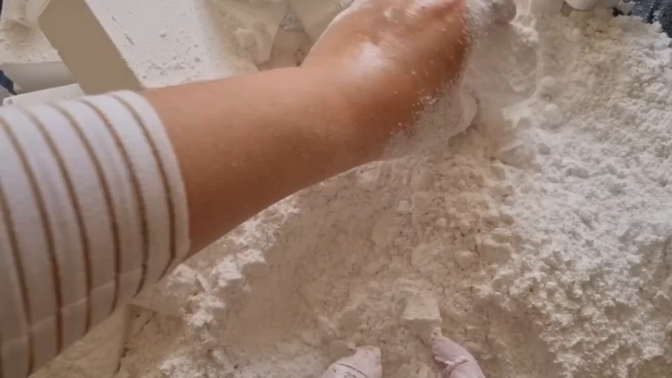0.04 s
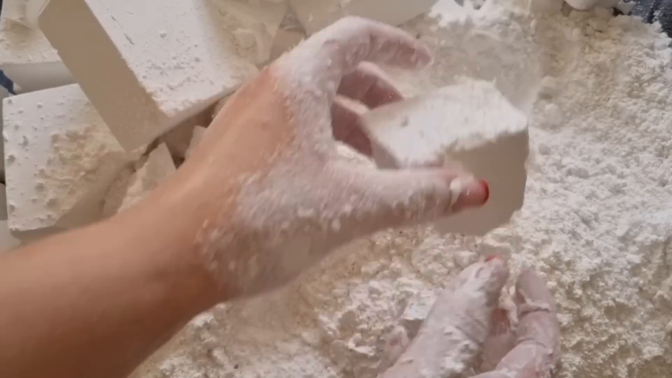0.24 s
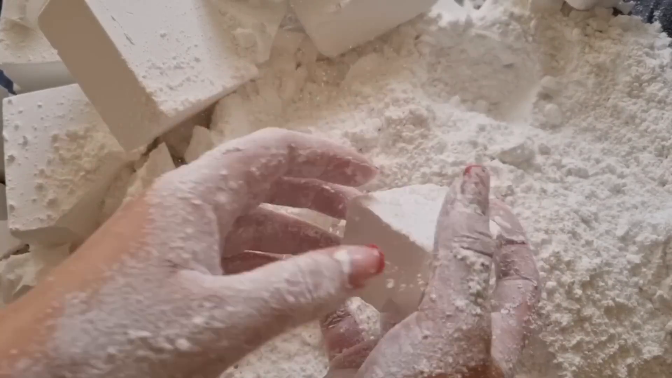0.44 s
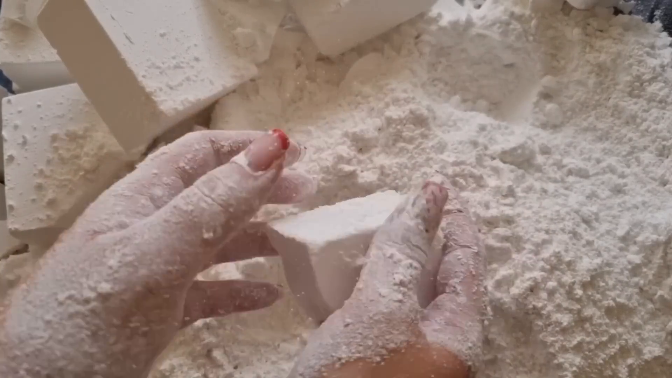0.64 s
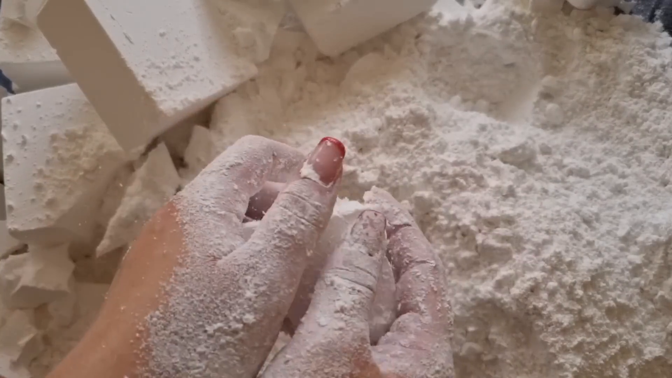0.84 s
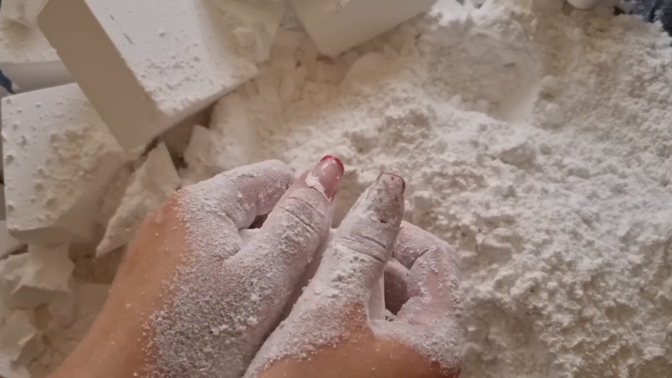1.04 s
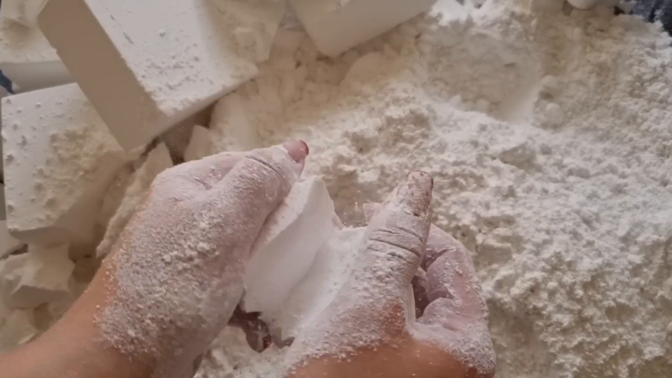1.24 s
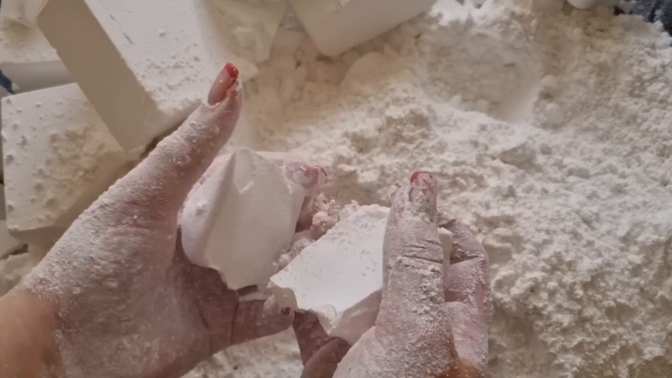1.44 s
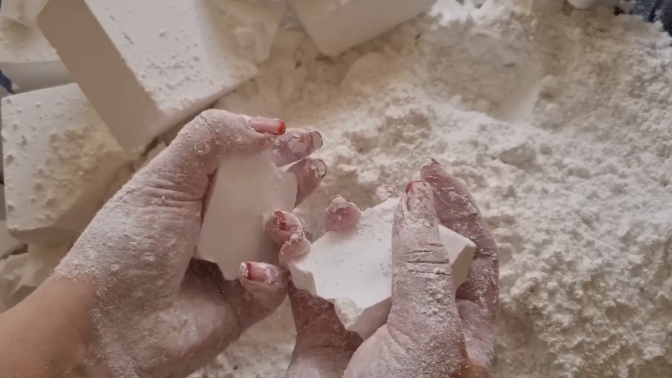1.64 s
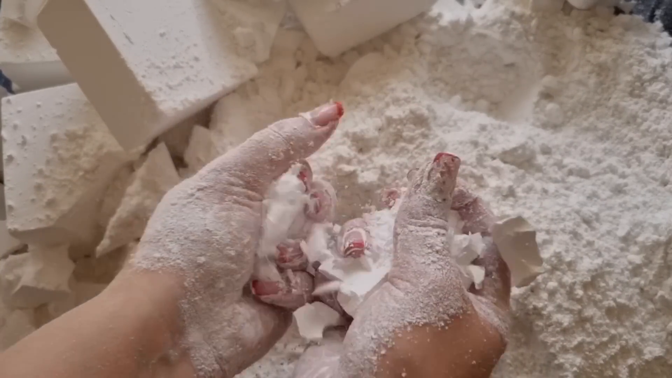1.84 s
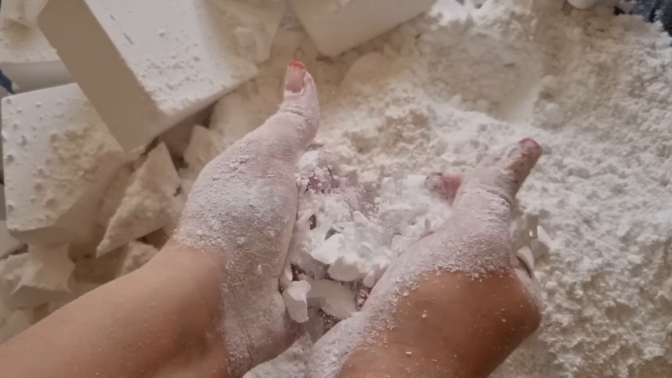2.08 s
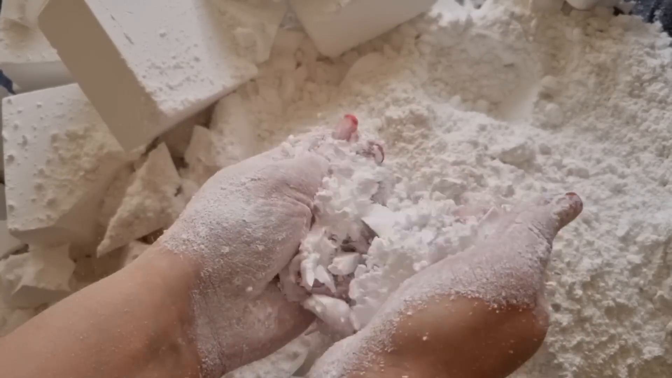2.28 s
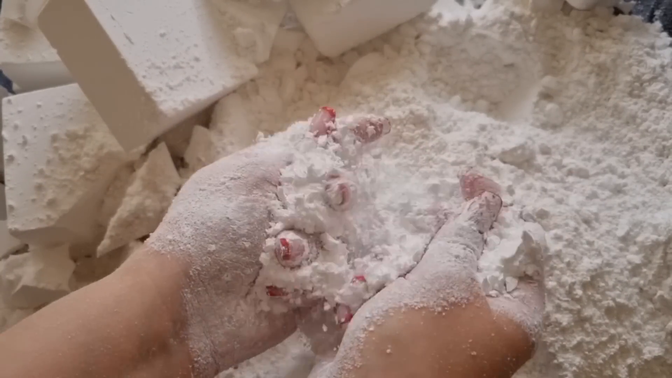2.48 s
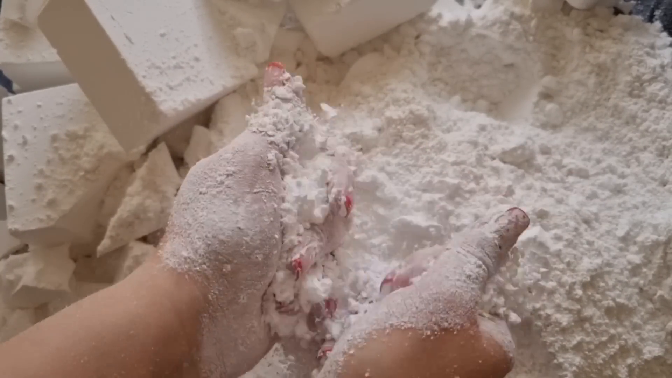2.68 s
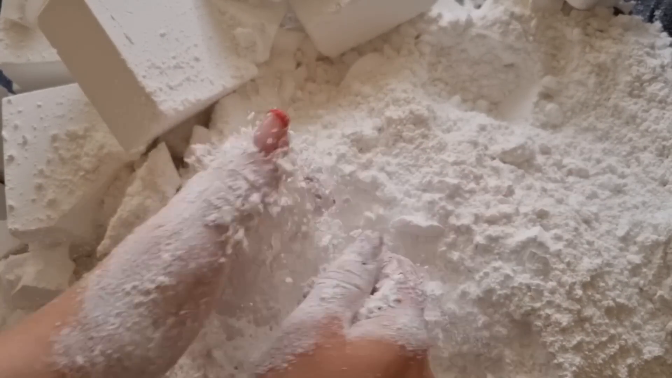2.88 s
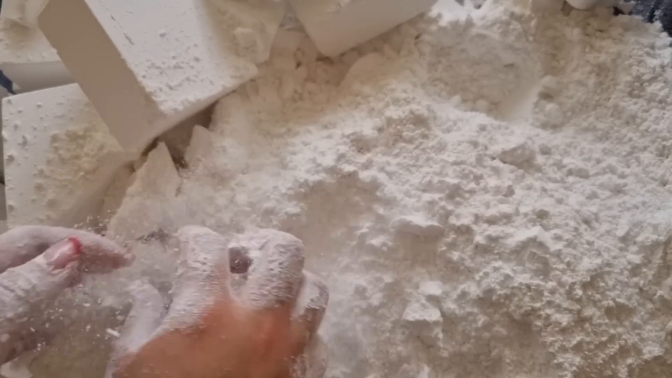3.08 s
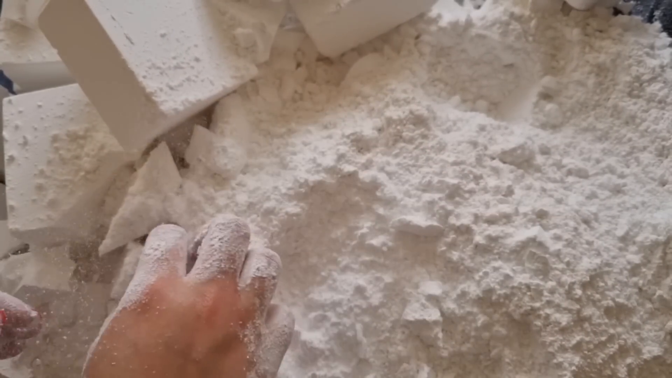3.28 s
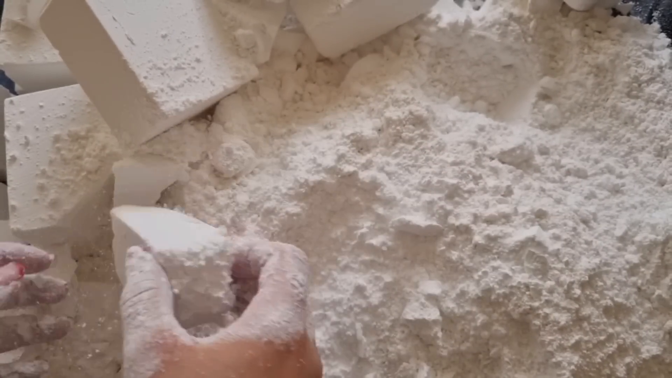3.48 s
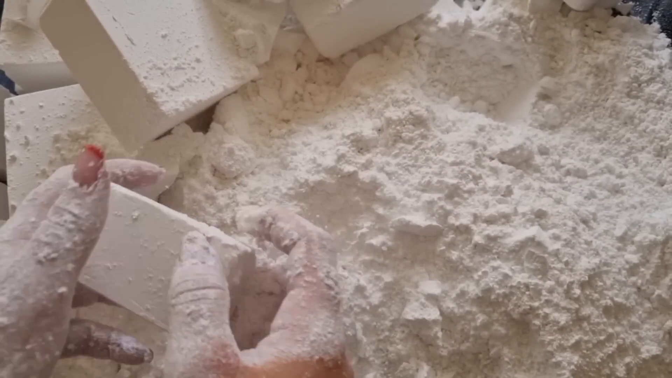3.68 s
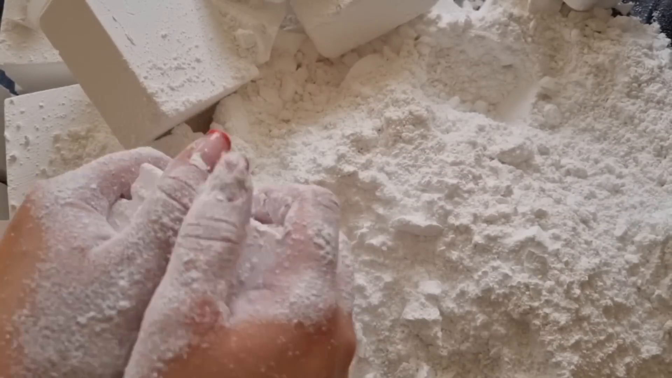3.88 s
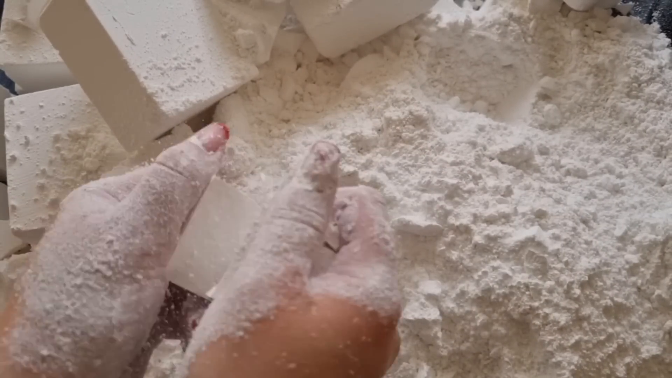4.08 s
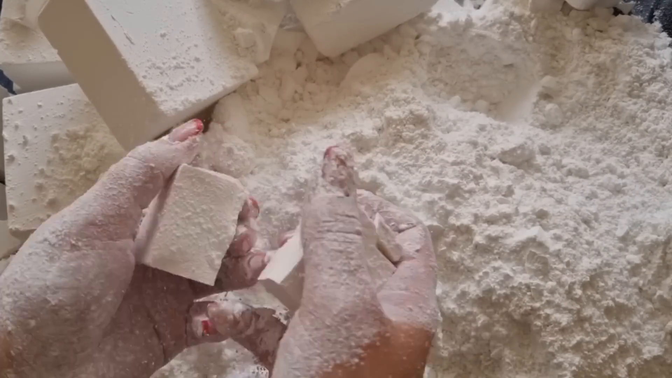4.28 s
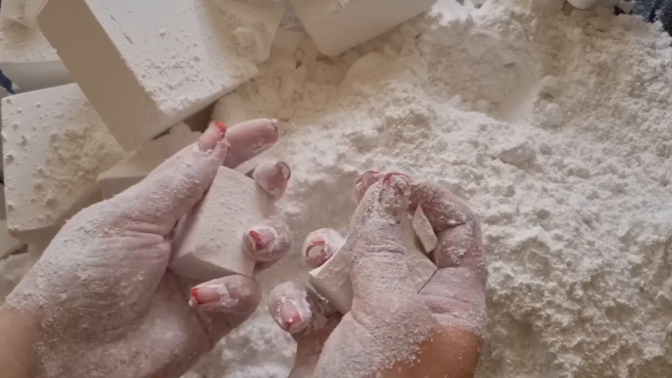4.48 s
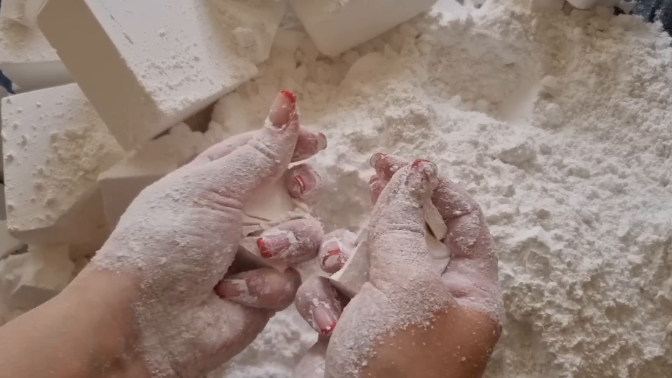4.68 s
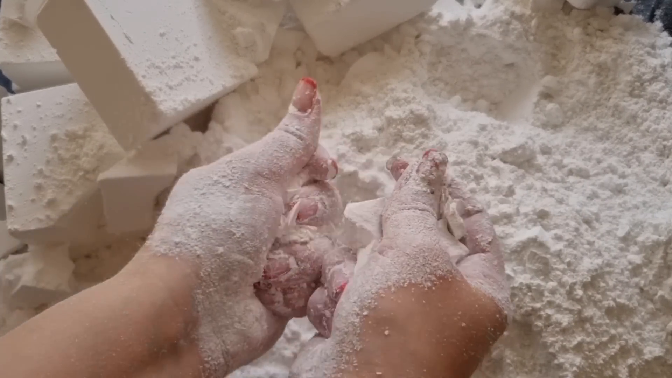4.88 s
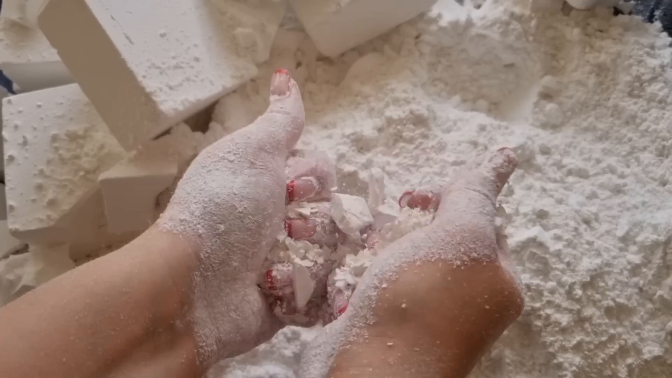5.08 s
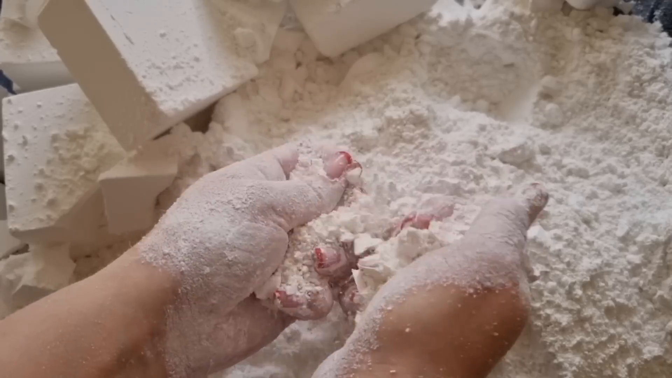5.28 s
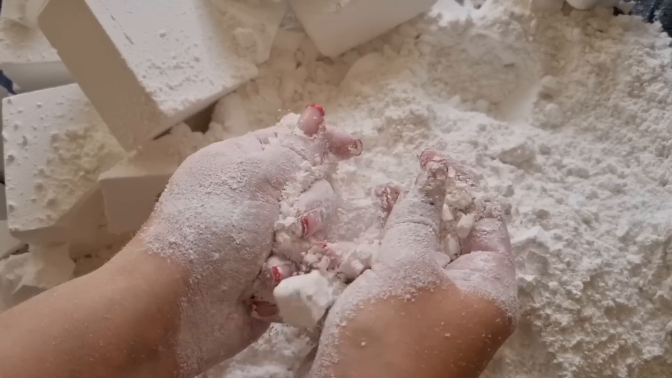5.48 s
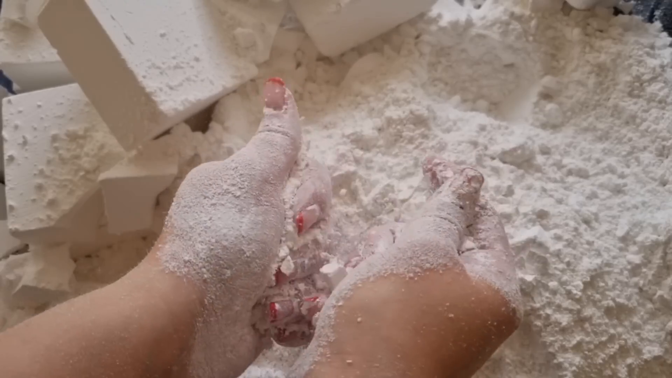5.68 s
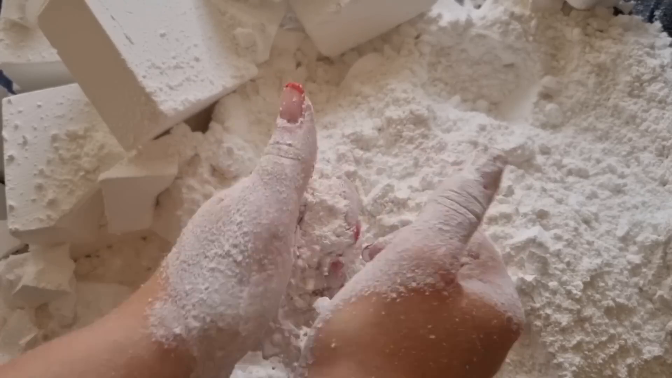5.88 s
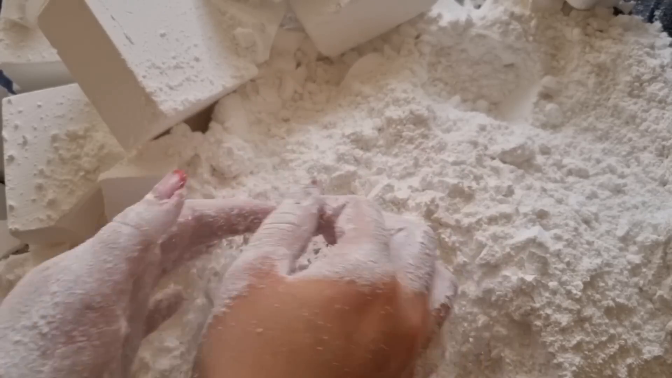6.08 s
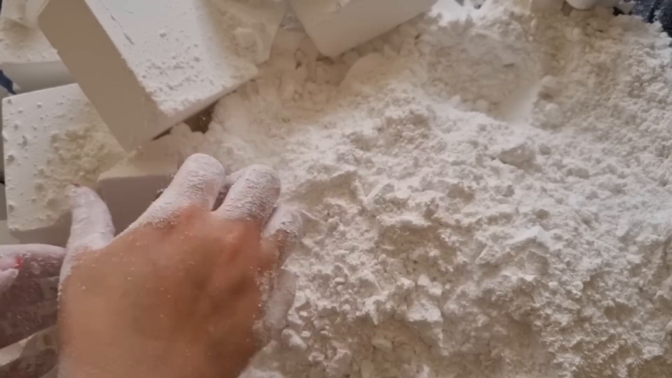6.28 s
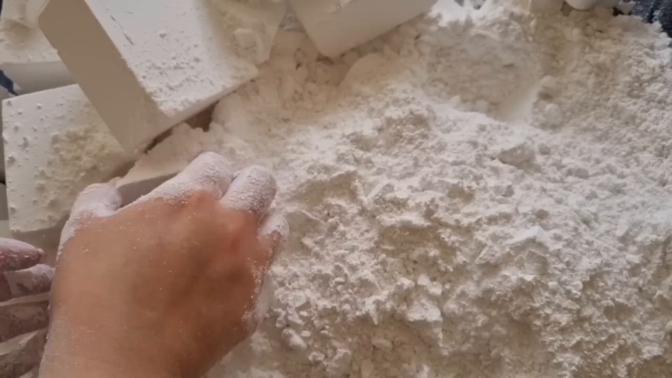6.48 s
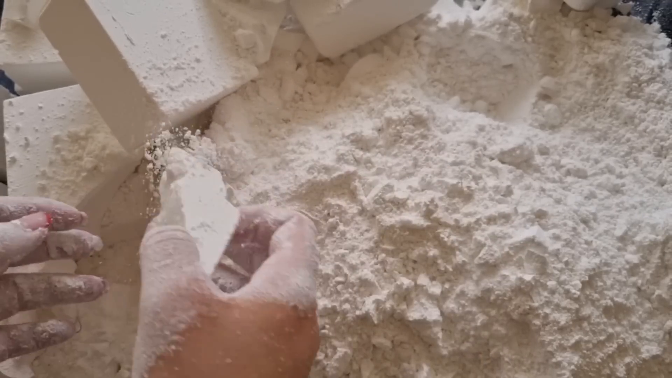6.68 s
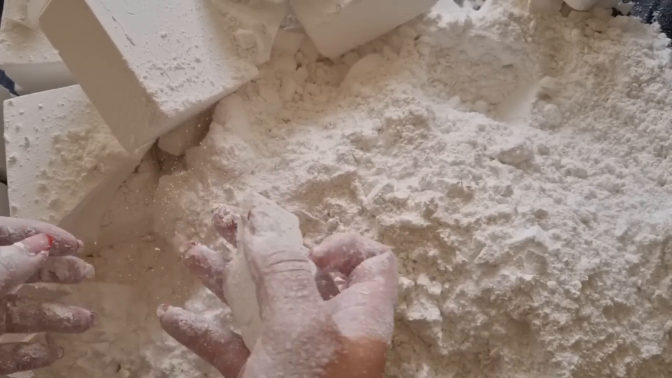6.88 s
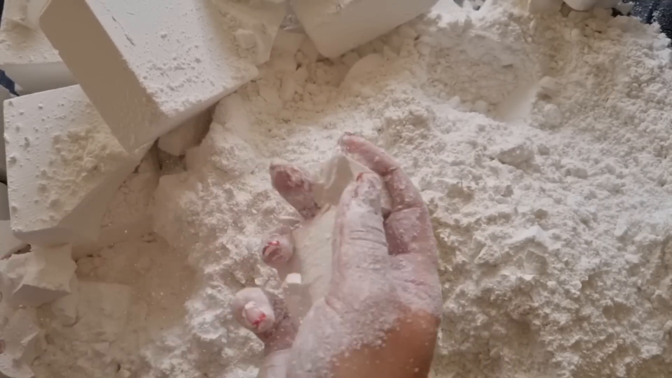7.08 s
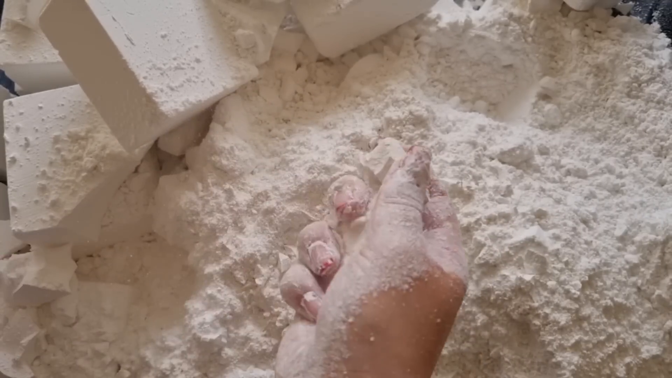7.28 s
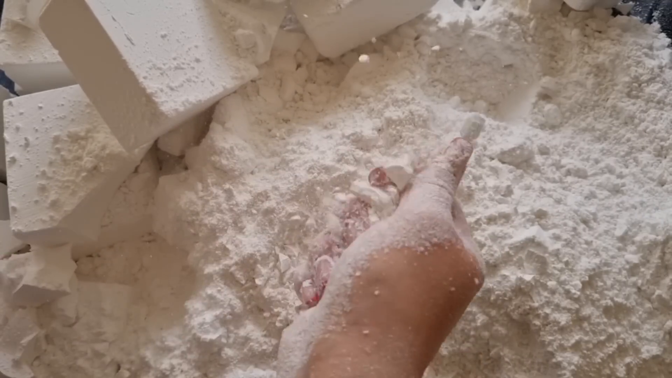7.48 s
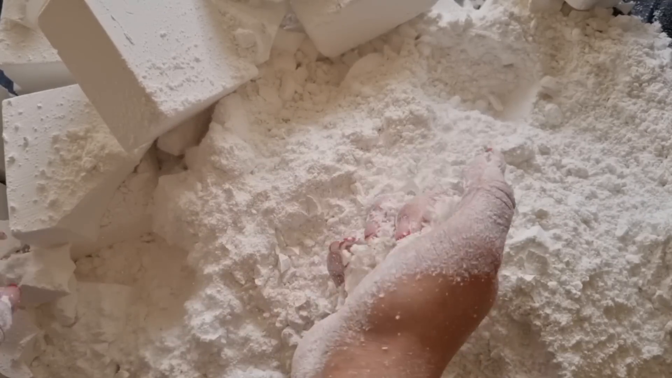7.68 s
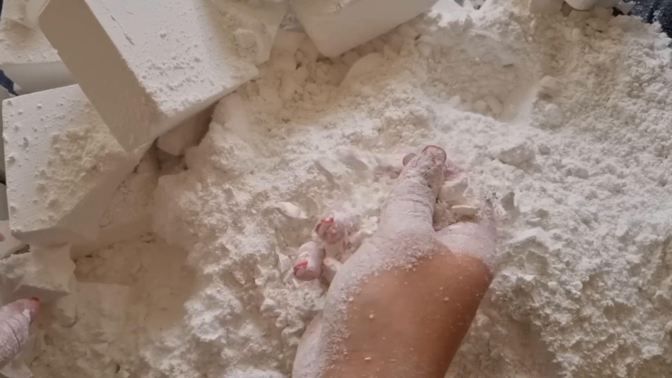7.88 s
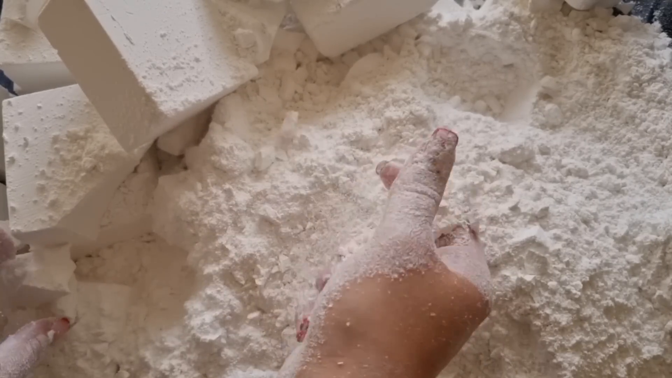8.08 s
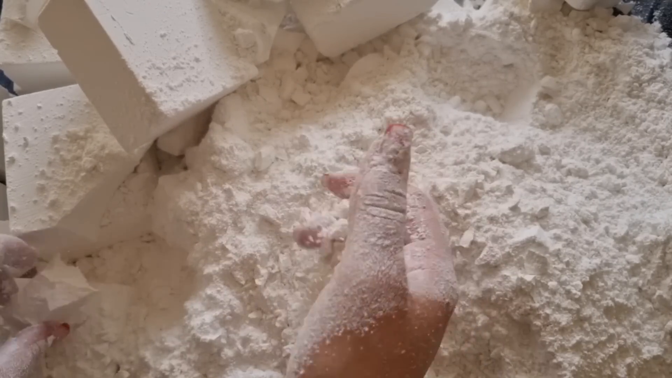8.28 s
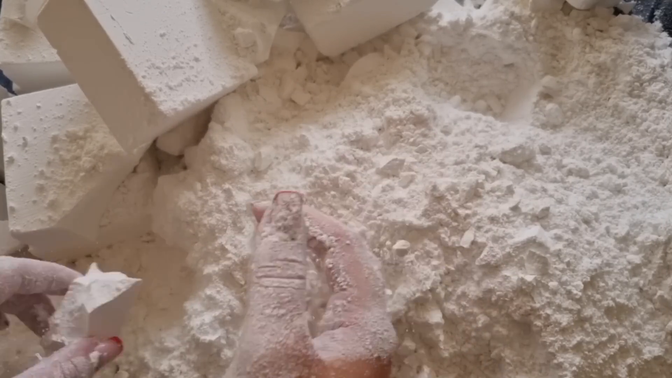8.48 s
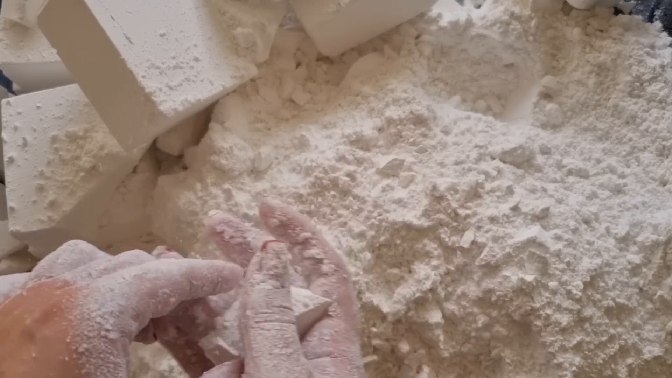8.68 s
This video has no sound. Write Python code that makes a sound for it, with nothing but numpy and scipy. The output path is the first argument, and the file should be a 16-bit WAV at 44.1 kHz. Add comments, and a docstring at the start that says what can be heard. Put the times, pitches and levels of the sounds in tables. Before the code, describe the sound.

Close, dry crunching as hands break three handfuls of chalk, with cracks, ticking crumbs, fine grit and dull knocks over faint room hush.

```python
"""Blocks of gym chalk snap with bright cracks and are crushed to grinding, trickling powder, close up in a quiet room.
Each crack is a quick run of micro-fractures that rings the piece and jolts the hand. Squeezes set off streams of
crumb ticks, soft pops and fine grit. Between them skin rubs over the block as coloured hiss, and dull knocks, short
decaying rings with a scuff of noise, mark landing lumps and the low thuds under some of the big cracks.
Box resonances, a short stereo echo and a low hush with a faint hum surround it all."""
import sys
import numpy as np
from scipy import signal
from scipy.fft import rfft, irfft
from scipy.io import wavfile
from scipy.ndimage import uniform_filter1d

SR = 44100
rng = np.random.default_rng(int(sys.argv[2]) if len(sys.argv) > 2 else 0)


def log_audio(samples):
    """Write samples as a 16-bit WAV file to the path given in sys.argv[1]."""
    # one column per channel
    frames = np.atleast_2d(samples).T
    # limit to full scale, then quantise
    limited = np.clip(frames, -1, 1)
    pcm = np.round(limited * 32767).astype(np.int16)
    wavfile.write(sys.argv[1], SR, pcm)


N = 385434


def amp(db):
    """Decibels to gain."""
    return 10 ** (np.asarray(db) / 20)


def unit(x):
    """Scale to rms 1."""
    return x / np.sqrt(np.mean(x ** 2) + 1e-30)


def along(points, hz):
    """Read (f/Hz, value) points on a log-frequency axis."""
    f, value = np.transpose(points)
    return np.interp(np.log(hz + 1), np.log(f), value)


def colour(x, points, size=2048):
    """Causal minimum-phase filter with the given (f/Hz, level/dB) response."""
    log_gain = np.log(amp(along(points, np.fft.rfftfreq(size, 1 / SR))))
    cepstrum = irfft(log_gain)
    # folding the cepstrum forward in time makes the filter minimum phase
    cepstrum[1:size // 2] *= 2
    cepstrum[size // 2 + 1:] = 0
    response = irfft(np.exp(rfft(cepstrum)))
    return signal.fftconvolve(x, response[None], axes=1)[:, :x.shape[1]]


def ring(x, hz, t60):
    """One damped resonance that falls 60 dB in t60 seconds."""
    pole = np.exp((2j * np.pi * hz - np.log(1000) / t60) / SR)
    return signal.lfilter([1], [1, -pole], x).real


def walk(rate):
    """Slow chance: random levels held 1 / rate s and slewed, rms 1."""
    hold = max(int(SR / rate), 2)
    steps = np.repeat(rng.standard_normal(N // hold + 1), hold)
    return unit(uniform_filter1d(steps, hold)[:N])


def add(out, t, sound):
    """Mix a stereo sound in at time t."""
    i = max(int(t * SR), 0)
    out[:, i:i + sound.shape[1]] += sound[:, :N - i]


def ports(at, size, length, lead_s=.00008, scatter_s=.00008, pan_db=6.5):
    """Clicks at the two microphone ports; each comes from its own place, the left port a little nearer on average."""
    place = rng.standard_normal((len(at), 2)).T
    lag = np.round(SR * (lead_s + scatter_s * place[0])).astype(int)
    side = amp(pan_db * place[1] / 2)
    left = np.bincount(np.clip(at, 0, length - 1), size * side, length)
    right = np.bincount(np.clip(at + lag, 0, length - 1), size / side, length)
    return np.array([left, right])


def grains(rate, spread_db):
    """A stream of tiny breaks, rate per second, whose strengths scatter exponentially in dB."""
    at = np.flatnonzero(rng.random(N) < rate / SR)
    strength = np.minimum(rng.exponential(size=N), 4.5)[at]
    force = amp(spread_db * strength) * rng.choice([-1, 1], len(at))
    return unit(ports(at, force, N))


def palms(x, share=0.54, decay_s=0.002, size=400):
    """Cupped hands scatter each click for a few milliseconds, differently toward each port."""
    t = np.arange(size) / SR
    response = rng.standard_normal((2, size)) * t * np.exp(-2 * t / decay_s)
    response *= share / np.sqrt(np.sum(response ** 2, axis=1, keepdims=True))
    response[:, 0] = 1  # the direct click
    return signal.fftconvolve(x, response, axes=1)[:, :x.shape[1]]


def blow(x, db):
    """Give a short sound the energy of 5 ms at this level."""
    return unit(x) * amp(db) * np.sqrt(.005 * SR / x.shape[1])


def hush(waver_db=-0.5):
    """Low room noise that swells and sinks, alike at both ports in the bass, with a faint mains hum."""
    # relative colour of the quiet room: (f/Hz, density/dB)
    hush_colour = [(20, -14.5), (45, 0.5), (70, 2), (130, -5.5), (210, -2), (320, -9), (600, -12),
                   (1000, -18), (2000, -27), (4000, -30), (7000, -30.5), (9500, -41.5), (13000, -31.5),
                   (16000, -38.5)]
    hush_db = -58
    hum_hz, hum_db = 49.4, -69
    fade_db_per_s = 0.27  # rumble and hum slowly sink
    time = np.arange(N) / SR
    hz = np.fft.rfftfreq(N, 1 / SR)
    mid, side = rfft(rng.standard_normal((2, N))) * amp(along(hush_colour, hz))
    side = side * amp(along([(100, -9.5), (400, 2.5), (1200, 2.5)], hz))
    air = unit(irfft(np.array([mid + side, mid - side]), N))
    hum = unit(np.sin(2 * np.pi * hum_hz * time)) * amp(hum_db + 2 * walk(1.2))
    # only the low part of the hush moves; the hiss above stays smooth
    rumble = signal.sosfiltfilt(signal.butter(2, 500, fs=SR, output="sos"), air)
    swell = amp(waver_db * walk(2.5) - fade_db_per_s * (time - time.mean()))
    return (air - rumble) * amp(hush_db) + (rumble * amp(hush_db) + hum) * swell


def room(x, wet_db=-7.5, treble_db=-3.0, alike_hz=320.2, size=32768):
    """A small live room: a diffuse tail at each port, every band dying at its own rate."""
    # decay of the echo: (f/Hz, t60/s)
    room_decay = [(150, 0.17), (500, 0.43), (1500, 0.34), (3000, .5), (7000, 0.25), (14000, 0.2)]
    gap_s = .004  # the tail fades in from half to one and a half times this
    t, hz = np.arange(size) / SR, np.fft.rfftfreq(size, 1 / SR)
    noise = rfft(rng.standard_normal((2, size)))
    turn = np.arccos(1 / (1 + (hz / alike_hz) ** 2))  # long waves reach both ports alike
    noise = np.array([noise[0], np.cos(turn) * noise[0] + np.sin(turn) * noise[1]])
    centres, t60s = np.transpose(room_decay)
    tail = np.zeros((2, size))
    for band, t60 in zip(np.eye(len(centres)), t60s):
        band_noise = irfft(noise * np.interp(hz, centres, band))
        even_energy = np.sqrt(2 * np.log(1000) / t60 / SR)  # long and short decays carry the same energy
        tail += band_noise * amp(-60 * t / t60) * even_energy
    fade_in = np.clip(t / gap_s - .5, 0, 1)
    tail = colour(tail * fade_in, [(150, -0.81), (500, 0.93), (2800, -1.4), (10000, treble_db)])
    return amp(wet_db) * signal.fftconvolve(x, tail, axes=1)[:, :N]


def surroundings(x, t60_s=0.27):
    """The box of powder and the nearby walls hum along at a few pitches."""
    # resonances of box and walls: (f/Hz, level/dB at the peak)
    box_modes = [(198, 3), (394, -10.5), (733, -6.5), (1135, -5), (2076, -9), (2775, -1.5)]
    gain = 2 * np.log(1000) / (t60_s * SR)  # brings the peak of a resonance to 1
    return sum(gain * amp(db) * ring(x, hz, t60_s) for hz, db in box_modes)


def knocks(scuff=0.49, scuff_s=.004, size=5000):
    """Dull knocks, each a decaying ring and a scuff of noise: lumps landing, and low thuds under some big cracks."""
    # dull knocks: (t/s, level/dB, f/Hz)
    dull_knocks = [(.030, -50, 315), (.096, -54.5, 1900), (.976, -51, 730), (1.1206, -31.5, 223),
                   (2.314, -44.5, 1140), (2.43, -44, 1390), (2.659, -47, 1010), (2.735, -44, 1210),
                   (3.128, -54, 716), (3.91, -58.5, 1970), (4.0282, -30, 746), (4.030, -35.5, 175),
                   (4.060, -37.5, 685), (4.657, -24, 347), (5.6636, -44.5, 1180), (5.955, -46, 240),
                   (5.971, -48, 935), (6.7333, -48, 550), (7.853, -38.5, 371), (8.228, -48.5, 520),
                   (8.299, -50.5, 1900), (8.5585, -44.5, 926)]
    ring_cycles = 14  # the ring falls 60 dB in this many cycles
    out, t = np.zeros((2, N)), np.arange(size) / SR
    for start, db, hz in dull_knocks:
        contact = rng.standard_normal((1, size)) * np.exp(-t / scuff_s)
        tone = np.sin(2 * np.pi * hz * t) * amp(-60 * t * hz / ring_cycles)
        scuff_noise = colour(contact, [(hz / 4, -14), (hz, 0), (hz * 2, -7), (hz * 8, -32)])
        add(out, start, blow(unit(tone) + scuff * unit(scuff_noise), db))
    return out


def rubbing(gap_cycles=30., gap_share=0.85, size=16384):
    """Skin drags dense fine grains over the block; the gap between finger and chalk colours each stroke
    differently. The briefest burst, at 4.063 s, is instead the bright snap of a small crack, shaped the same
    way."""
    # strokes: (middle t/s, Gaussian half length/s, level/dB at the middle, resonance f/Hz); the 6 ms row at
    # 4.063 s is the snap of a small crack
    strokes = [(0.352, .015, -53.5, 3840), (0.577, 0.02, -50.5, 3720), (.62, .045, -54.5, 6900),
               (0.861, .07, -56.5, 4050), (0.963, .035, -50, 4120), (1.344, .018, -53, 5500),
               (1.481, .03, -49, 5070), (1.626, .053, -61.5, 6050), (3.184, .014, -60.5, 5400),
               (3.531, .017, -60, 5450), (3.841, .034, -61, 5520), (4.063, .006, -43, 5700),
               (4.261, .037, -56, 7350), (4.345, .029, -45, 7330), (4.508, .039, -52, 7400),
               (8.199, .045, -57, 7470), (8.671, .013, -43.5, 4930), (8.706, .03, -50.5, 7300)]
    # colour of dusty skin on chalk: (f/Hz, level/dB)
    skin_colour = [(1500, -31), (2600, -12.5), (3500, -6.5), (5000, -7), (7200, -3), (10000, -10),
                   (13000, -5), (16000, -18.5)]
    out, t = np.zeros((2, N)), (np.arange(size) - size // 2) / SR
    friction = grains(rate=8700, spread_db=4.5) * amp(2 * walk(120))
    for middle, width_s, db, hz in strokes:
        i = rng.integers(N - size)
        hiss = colour(palms(friction[:, i:i + size], share=1.0), skin_colour)
        gap = unit(ring(hiss, hz, gap_cycles / hz))
        stroke = unit(unit(hiss) + gap_share * gap)
        add(out, middle + t[0], stroke * amp(db) * np.exp(-.5 * (t / width_s) ** 2))
    return out


def squeezing():
    """Strength of coarse crumbs and of fine grit: each squeeze builds, holds, eases off and leaves a trickle."""
    # squeezes of the fingers: (t/s, length/s, coarse crumb level/dB, fine grit level/dB), ahead of the layer mix
    squeezes = [(1.66, 0.13, -42, -39.5), (1.807, 0.078, -36, -40), (1.923, 0.12, -44, -45),
                (2.201, 0.14, -47, -55), (2.374, .14, -49, -58), (2.554, 0.13, -49.5, -61.5),
                (2.792, 0.068, -57, -66.5), (2.93, 0.15, -63.5, -71.5), (4.628, 0.047, -30.5, -39),
                (4.716, 0.03, -32, -32.5), (4.843, 0.18, -43, -43.5), (5.169, 0.081, -44, -58),
                (5.275, 0.15, -50, -53.5), (5.463, 0.2, -50.5, -54.5), (5.699, 0.23, -57.5, -67),
                (5.946, 0.095, -56, -62), (6.933, 0.19, -60, -64), (7.188, 0.048, -44, -45.5),
                (7.32, 0.11, -41, -42.5), (7.51, 0.19, -56, -62), (7.714, 0.034, -44.5, -52.5),
                (7.879, 0.16, -54.5, -57), (8.203, 0.12, -62, -68)]
    grip_s, let_go_s = .02, .015  # closing time of the fingers, time constant of easing off
    trickle_share, trickle_s = 0.59, .08  # loosened crumbs run on, with this time constant
    power = np.zeros((2, N))
    t = np.arange(SR) / SR
    for start, length_s, coarse_db, fine_db in squeezes:
        after = np.maximum(t - length_s, 0)
        release = (1 - trickle_share) * np.exp(-after / let_go_s) + trickle_share * np.exp(-after / trickle_s)
        grip = np.minimum(t / grip_s, 1)
        add(power, start, (amp([[coarse_db], [fine_db]]) * grip * release) ** 2)
    return np.sqrt(power)


def crumbling(coarse_db=-0.5, fine_db=1.5, lump_db=-1.5, fist_db=-17., chip_share=0.91,
              surge_db=2.5, bunch_db=1.67, count=16):
    """Crumbs give way in surges, each size ticking at its own pitch; soft lumps pop among them and fine grit hisses."""
    # colours of crumbs, of fine grit, of a soft lump giving way,
    # and of grinding felt through the flesh of the hands: each (f/Hz, level/dB)
    crumb_colour = [(80, -27.5), (200, -5.5), (400, -0.5), (600, -8), (750, -8), (900, -5.5), (1200, -8.5),
                    (1650, -1.5), (2300, -8.5), (2900, -5.5), (4000, -14.5), (7000, -32), (14000, -51.5)]
    grit_colour = [(1200, -26), (2800, 4.5), (3900, 0.5), (5500, -1.5), (7500, -6), (10000, -15.5),
                   (13000, -11.5), (16000, -16)]
    lump_colour = [(150, -26), (500, -12), (900, -2), (1300, 1.5), (1800, 0.5), (2400, -10), (3200, -8),
                   (4500, -19.5), (9000, -37.5)]
    fist_colour = [(25, -14), (60, -1), (120, 0.5), (220, -2.5), (500, -22.5), (2000, -60)]
    surge = amp(surge_db * walk(70))
    coarse = palms(grains(rate=800, spread_db=4.8)) * surge
    fine = palms(grains(rate=5000, spread_db=-0.5)) * surge
    ticks = np.zeros((2, N))
    for hz in np.geomspace(450, 4200, count):
        tick = unit(ring(grains(rate=110, spread_db=3.6), hz, 12 / hz))
        ticks += tick * np.sqrt(hz) * amp(3 * walk(12))
    lumps = unit(colour(palms(grains(rate=45, spread_db=2.5)), lump_colour))
    crunch = unit(colour(coarse, crumb_colour))
    pitched = unit(colour(ticks, crumb_colour))
    crumbs = unit(crunch + pitched + amp(lump_db) * lumps)
    grit = unit(colour(fine + chip_share * coarse, grit_colour))
    on_crumbs, on_grit = squeezing() * amp(bunch_db * walk(55))  # the powder yields in fits and starts
    fists = unit(colour(coarse.mean(axis=0, keepdims=True), fist_colour))
    return (crumbs * amp(coarse_db) + fists * amp(fist_db)) * on_crumbs + grit * on_grit * amp(fine_db)


def even(x, share=.8, width_hz=600.0):
    """Flatten the broad peaks and notches that the few random clicks leave in the crack's spectrum."""
    spectrum = rfft(x)
    width = max(int(width_hz * x.shape[1] / SR), 1)
    power = uniform_filter1d(np.abs(spectrum) ** 2, width, axis=1)
    return irfft(spectrum * (power + 1e-9) ** (-min(share, 1) / 2), x.shape[1])


def wholeness(t):
    """How much of the piece in hand is still in one lump: 1 until it caves in, then falling toward 0."""
    # handfuls of chalk: (picked up t/s, starts to cave in t/s)
    handfuls = [(0, 1.7), (3.3, 4.64), (6.5, 7.2)]
    cave_in_s = 0.16  # time constant of falling apart
    current = max(sum(t >= picked for picked, _ in handfuls) - 1, 0)
    caves_in = handfuls[current][1]
    return np.exp(-max(t - caves_in, 0) / cave_in_s)


def cracks(ring_share=0.55, follow=0.51, spread_db=4., damp_db=-14.0, count=9, size=3000):
    """A first break sets off micro-fractures, mostly weaker; they snap, ring the piece and jolt the hand."""
    # cracks: (t/s, body level/dB, snap level/dB, ring of the piece f/Hz, left minus right/dB)
    breaks = [(1.1198, -25.5, -34, 1580, -1), (1.2023, -39, -43.5, 2600, -0.5),
              (1.2147, -38.5, -49, 3540, 0), (1.6679, -36.5, -30.5, 5070, 2.5),
              (1.7055, -28.5, -29, 3800, 0.5), (1.7603, -20, -26.5, 1680, 3), (1.7871, -29, -36, 1140, 0),
              (1.8377, -19.5, -34.5, 1720, 7), (1.844, -27.5, -37, 1444, -1),
              (1.8696, -17.5, -38, 1388, 1.5), (1.8943, -20, -39, 1560, 3.5), (1.997, -34, -42, 1370, 2),
              (2.0307, -28, -43, 1590, 2), (2.6252, -40, -64.5, 3360, -1.5), (4.027, -18, -39, 1400, 4.5),
              (4.1306, -41, -43.5, 3700, 2), (4.64, -21, -34.5, 1560, 8), (4.6545, -19, -23.5, 766, -2),
              (4.674, -23, -35, 3180, 6), (4.7253, -24, -32, 1800, 1.5), (4.739, -28, -22, 5500, -2),
              (4.7917, -28.5, -31, 4840, -2.5), (4.8009, -23, -31.5, 3030, 3),
              (4.849, -5, -21.5, 2490, 2.5), (4.9606, -29.5, -33.5, 4580, 0), (4.9777, -32, -55, 1670, 7),
              (5.0084, -32.5, -54, 1800, 1), (5.0385, -27, -36.5, 1210, -3), (5.387, -34.5, -40.5, 1630, 6),
              (5.5033, -29.5, -38, 3420, -0.5), (5.53, -31.5, -42, 3270, -3),
              (5.5634, -37.5, -44, 2670, -1), (5.6113, -33, -39.5, 1680, 4.5), (5.724, -45, -60, 1720, 7.5),
              (6.0325, -39.5, -56, 2002, 1), (6.991, -42.5, -45, 5790, 3.5), (7.056, -59, -44.5, 5000, 1),
              (7.099, -51, -45.5, 4000, 6), (7.1987, -27.5, -23.5, 4700, 1), (7.216, -31, -42, 2900, 3),
              (7.3023, -28.5, -33.5, 4080, -4), (7.333, -28.5, -39, 2380, 1), (7.3772, -14, -22, 2600, 0),
              (7.425, -32, -35.5, 2500, 1), (7.68, -45, -63, 3240, -0.5), (7.7334, -28.5, -51, 4380, -0.5),
              (8.0, -47, -62, 3030, 1), (8.2208, -50, -41.5, 6300, 7), (8.247, -55, -47, 5460, 3.5)]
    # colours of the jolt to the hand, the breaking body and the bright snap: each (f/Hz, level/dB)
    thud_colour = [(50, -35), (130, -10.5), (220, -4.5), (400, 1.5), (600, -5.5), (900, -23.5), (2000, -44)]
    body_colour = [(100, -44.5), (600, -15.5), (740, -5.5), (900, -10), (1150, -1), (2050, -1), (2400, -7),
                   (2850, -1), (3600, -2.5), (10000, -45.5)]
    snap_colour = [(500, -55.5), (2800, -15), (3900, 5), (5500, 6.5), (7500, 4), (10000, -6.5),
                   (13000, -3.5), (16000, -2)]
    fracture_s, scatter = .0013, .15  # typical mean delay in the loudest crack, its log spread
    halving_db = 35.  # a crack this much fainter runs half as long
    crumb_thud_db, whole_thud_db = -20, -9.5  # jolt against the body: small crumb, whole piece
    ring_cycles, lead_s = 9, .004  # cycles to fall 60 dB, silence ahead of the break
    out = np.zeros((2, N))
    loudest_db = max(row[1] for row in breaks)
    for t, body_db, snap_db, hz, pan_db in breaks:
        run_s = fracture_s * 2 ** ((body_db - loudest_db) / halving_db)
        run_s *= np.exp(scatter * rng.standard_normal())
        thud_db = body_db + crumb_thud_db + (whole_thud_db - crumb_thud_db) * wholeness(t)
        delay = rng.exponential(run_s, count)
        force = follow * amp(spread_db * rng.standard_normal(count)) * np.exp(-delay / run_s / 3)
        force *= rng.choice([-1, 1], count)
        delay[0], force[0] = run_s / 4, 1  # the first break
        clicks = even(palms(ports(((lead_s + delay) * SR).astype(int), force, size)))
        piece = unit(ring(clicks, hz, ring_cycles / hz))
        clarity = ring_share * (1 + (hz / 3600) ** 4)  # small chips ring more clearly than they crunch
        # the fingers damp whatever lies above the piece's own ring, so big pieces sound dull
        grip = [(hz / 10, -12), (hz / 3, 0), (1.165 * hz, 0), (2.33 * hz, damp_db)]
        body = colour(unit(colour(clicks, body_colour)) + clarity * piece, grip)
        thud = blow(colour(clicks, thud_colour), thud_db)
        snap = blow(colour(clicks, snap_colour), snap_db)
        sound = blow(body, body_db) + thud + snap
        add(out, t - lead_s, sound * amp(np.array([[pan_db], [-pan_db]]) / 2))
    return out


def scene():
    """The chalk close by, its resonant surroundings, its echo and the room."""
    chalk = cracks() + crumbling() + rubbing() + knocks()
    return chalk + surroundings(chalk) + room(chalk) + hush()


def record(dry):
    """Peaks beyond full scale overload the recorder and clip; a steep filter cuts the top."""
    top_hz = 16100
    clipped = np.clip(dry, -1, 1)
    return signal.sosfilt(signal.ellip(8, .2, 70, top_hz, fs=SR, output="sos"), clipped)


dry = scene()
out = record(dry)
log_audio(out)
```